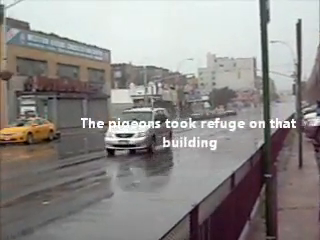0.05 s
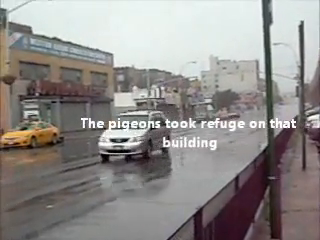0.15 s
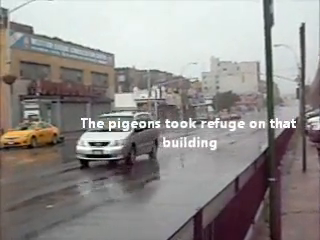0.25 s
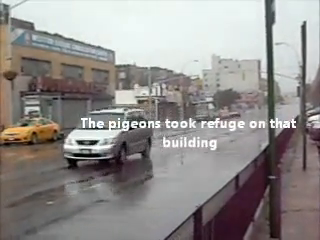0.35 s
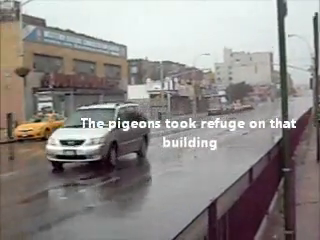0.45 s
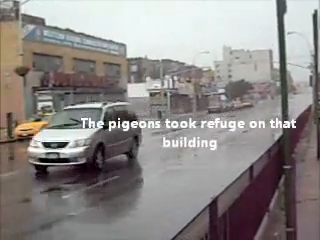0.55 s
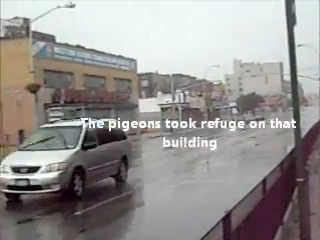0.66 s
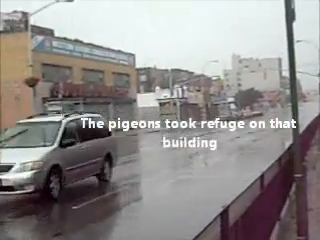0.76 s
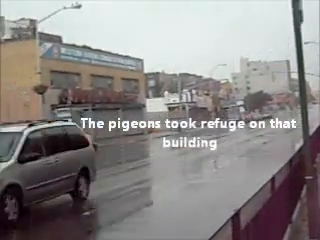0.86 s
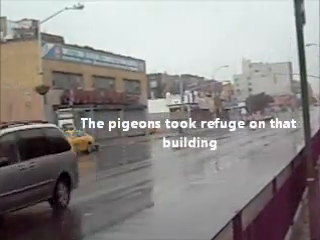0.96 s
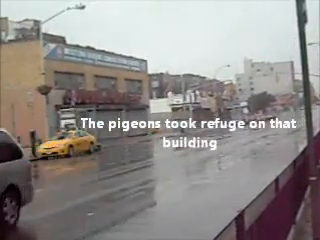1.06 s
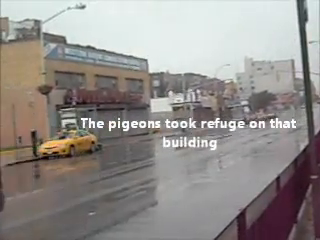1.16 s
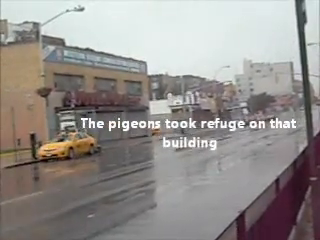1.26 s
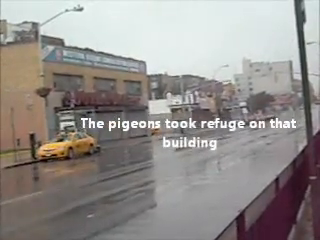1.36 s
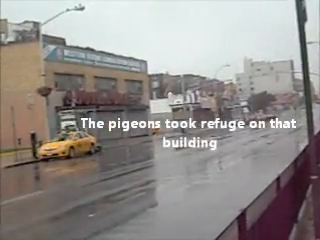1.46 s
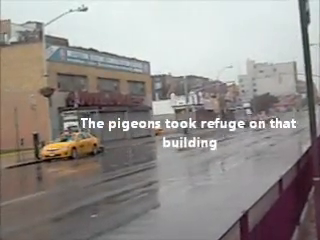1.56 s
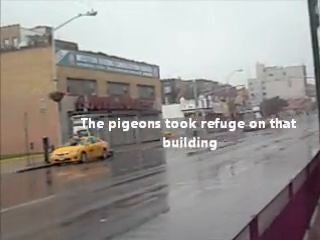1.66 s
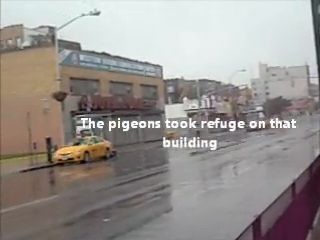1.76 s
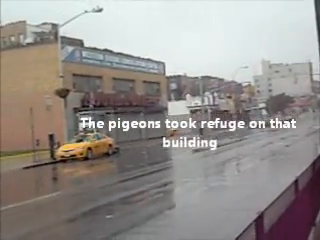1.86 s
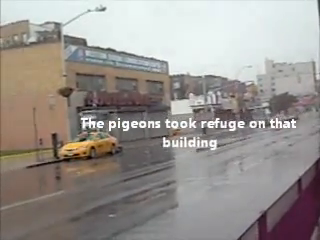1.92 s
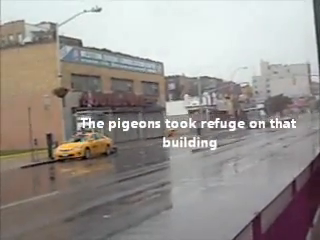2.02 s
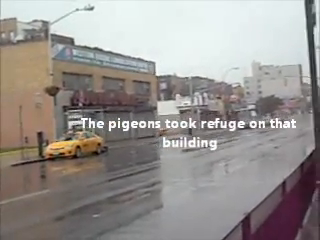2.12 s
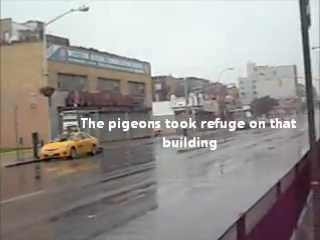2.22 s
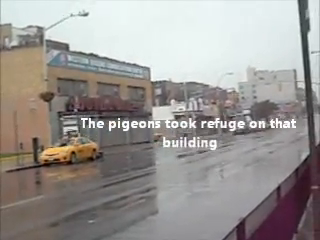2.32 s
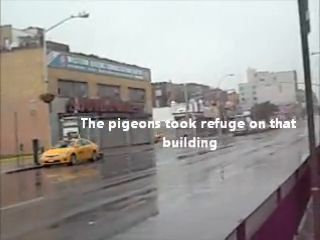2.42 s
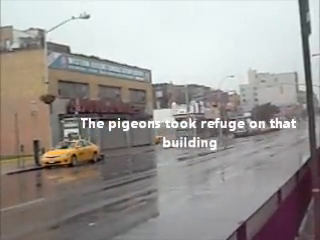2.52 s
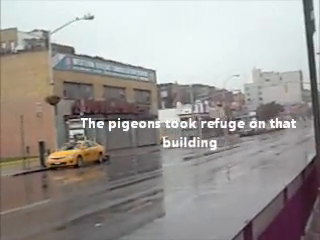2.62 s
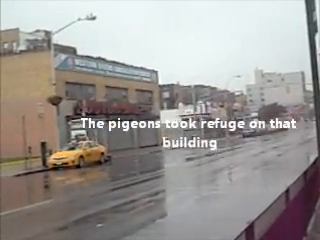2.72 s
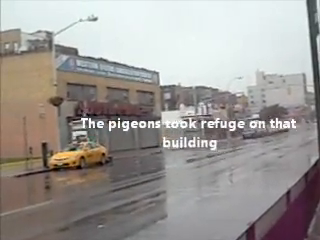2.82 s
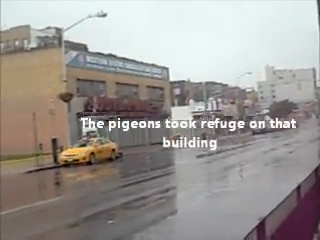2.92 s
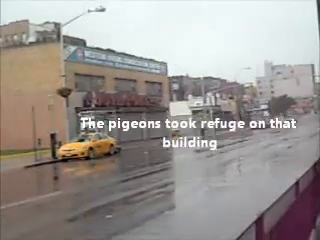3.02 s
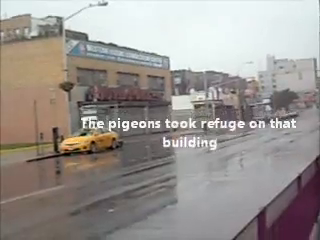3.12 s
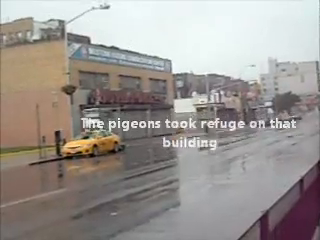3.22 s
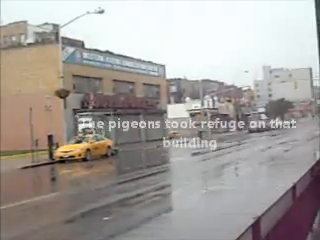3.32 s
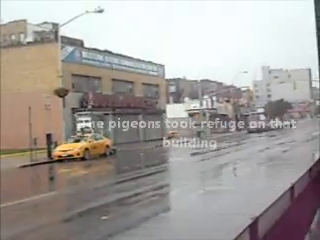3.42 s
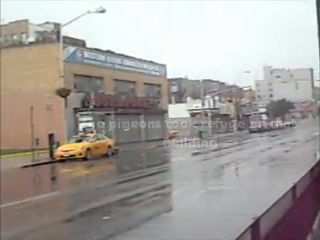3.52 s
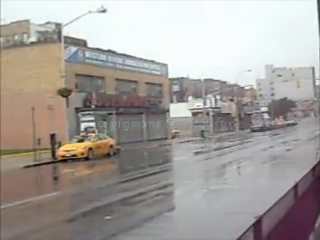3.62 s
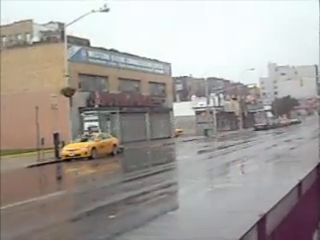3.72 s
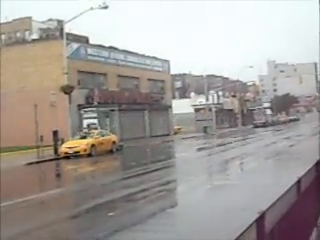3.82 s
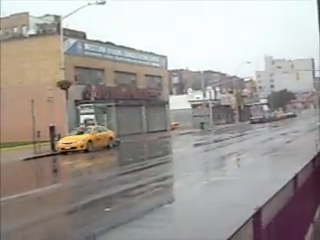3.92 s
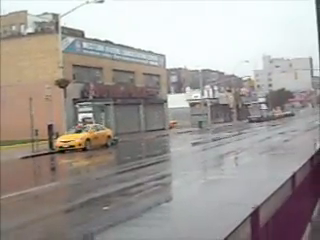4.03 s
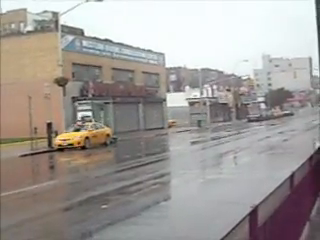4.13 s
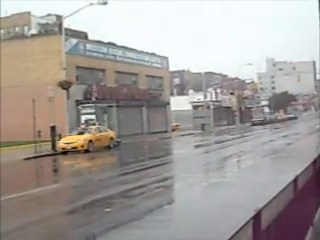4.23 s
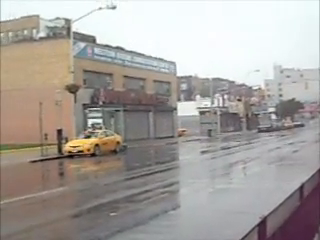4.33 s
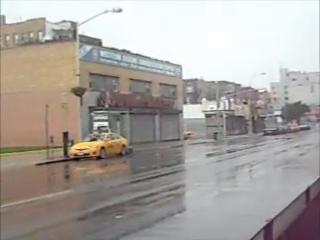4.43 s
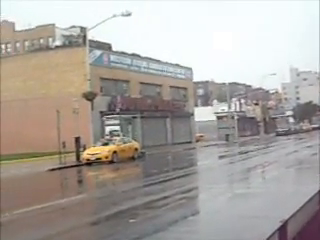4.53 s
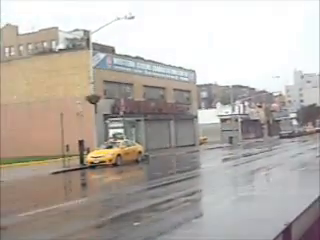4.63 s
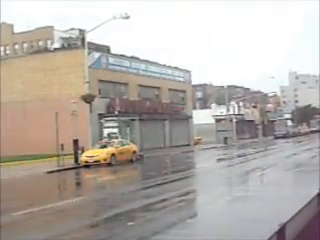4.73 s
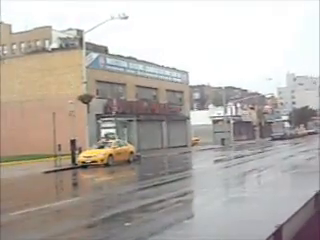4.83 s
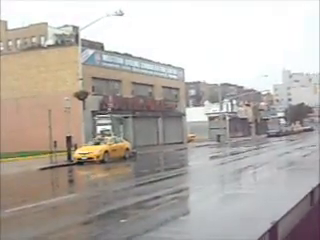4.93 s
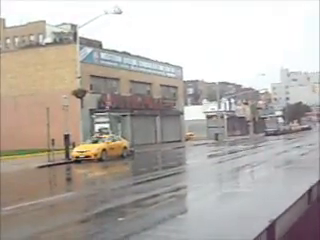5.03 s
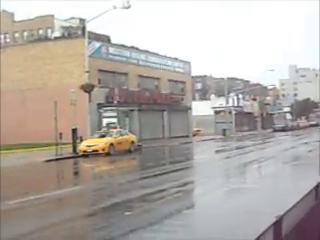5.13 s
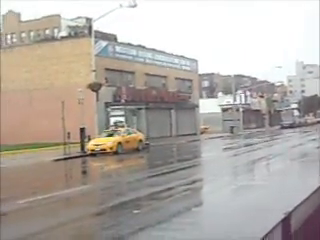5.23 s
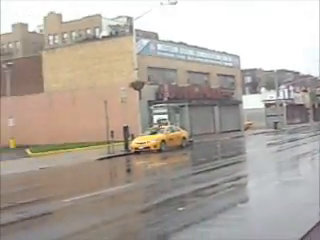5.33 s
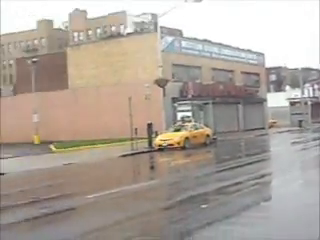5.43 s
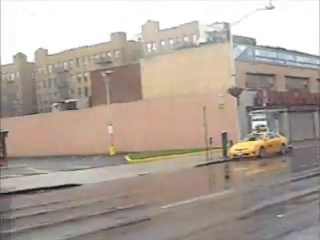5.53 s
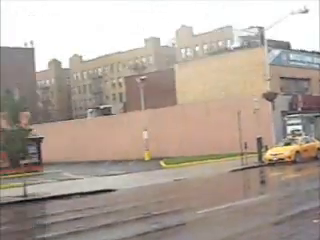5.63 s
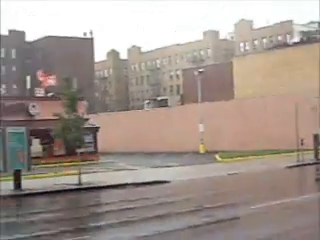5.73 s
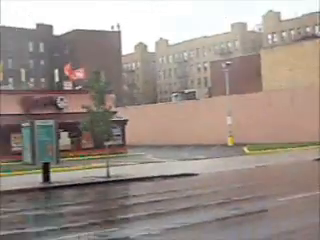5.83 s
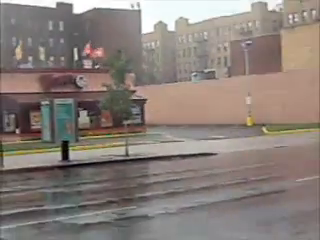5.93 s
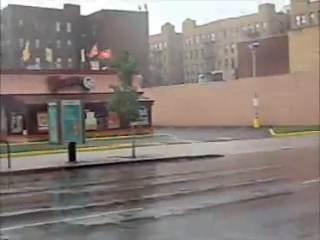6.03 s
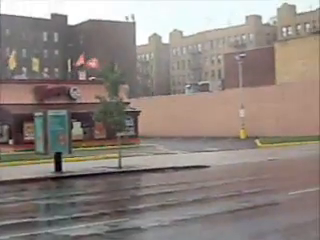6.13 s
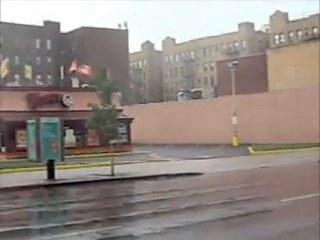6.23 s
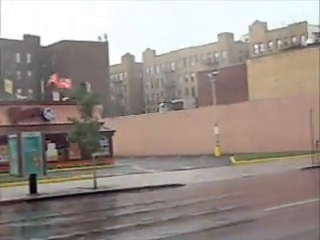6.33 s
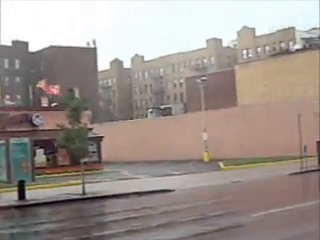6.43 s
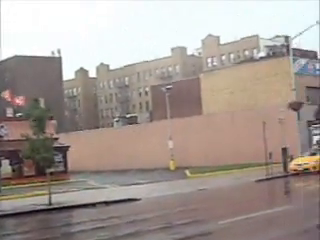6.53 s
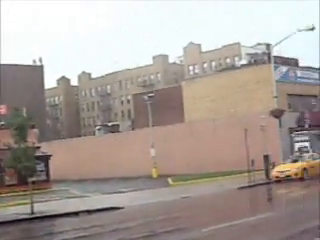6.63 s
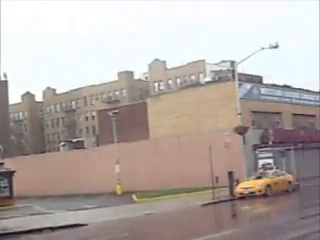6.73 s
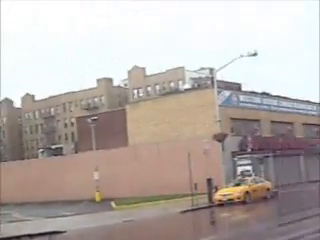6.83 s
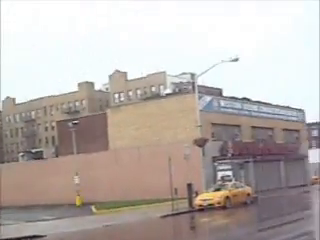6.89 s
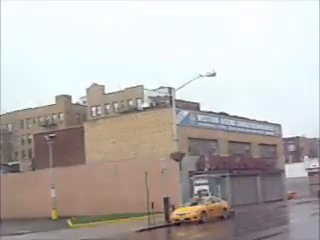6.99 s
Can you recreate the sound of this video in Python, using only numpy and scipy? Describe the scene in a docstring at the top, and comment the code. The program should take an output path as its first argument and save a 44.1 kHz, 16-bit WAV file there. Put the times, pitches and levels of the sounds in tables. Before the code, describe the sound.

Wet tyres swell and fade close by, quieter cars follow, and gusty wind thuds, flutters and finally rattles hard against a narrow-band camera microphone.

```python
"""A minivan hisses past on wet asphalt, close to a small camera on the pavement of a windy city street.
Its tyres are shaped noise that swells and fades with distance; more cars and far traffic swish behind it.
At the microphone, single pressure pulses thump as eddies and noise bursts rattle as gusts, the hardest
into overload. Low wind noise rumbles throughout, and two wavering sines hum as a distant engine."""
import sys
import numpy as np
from scipy import signal
from scipy.fft import rfft, irfft, next_fast_len
from scipy.io import wavfile
from scipy.ndimage import uniform_filter1d, map_coordinates

SR = 44100
rng = np.random.default_rng(int(sys.argv[2]) if len(sys.argv) > 2 else 0)


def waveform_to_disk(signal):
    """Save audio, clipped to [-1, 1], as 16-bit WAV at the path in sys.argv[1]."""
    frames = np.transpose(np.atleast_2d(signal))
    scaled = np.clip(frames, -1, 1) * 32767
    samples = np.round(scaled).astype(np.int16)
    wavfile.write(sys.argv[1], SR, samples)


N = 311346
TIME = np.arange(N) / SR  # s


def amp(db):
    """Decibels to gain."""
    return 10 ** (np.asarray(db) / 20)


def unit(x):
    """Scale to rms 1."""
    return x / np.sqrt(np.mean(x ** 2) + 1e-20)


def curves(rows):
    """One value per sample for each column after the time, gliding between the rows."""
    times, *columns = np.transpose(rows)
    return [np.interp(TIME, times, column) for column in columns]


def wobble(rate):
    """A smooth random curve through normally distributed knots, rate knots a second."""
    knots = rng.standard_normal(int(N * rate / SR) + 4)
    return map_coordinates(knots, [TIME * rate])


def filtered(x, response):
    """x with its spectrum multiplied by a response of frequency in Hz."""
    size = next_fast_len(N + SR // 2)
    hz = np.fft.rfftfreq(size, 1 / SR)
    return irfft(rfft(x, size) * response(hz), size)[:N]


def lowpass(hz, edge_hz, order):
    """Gain of a flat low-pass."""
    return 1 / np.sqrt(1 + (hz / edge_hz) ** (2 * order))


def coloured(x, spectrum):
    """x shaped by (pitch_hz, level_db) points, at rms 1."""
    point_hz, point_db = np.transpose(spectrum)

    def response(hz):
        return amp(np.interp(np.log(hz + 1), np.log(point_hz), point_db))

    return unit(filtered(x, response))


def rush(spectrum, patchy_db):
    """Noise of rms 1 whose gain varies at random in small patches of time and pitch."""
    cells = signal.stft(rng.standard_normal(N), nperseg=1024)[2]
    patches = uniform_filter1d(rng.standard_normal(cells.shape), size=3, axis=0)
    patches = uniform_filter1d(patches, size=7, axis=1)
    noise = signal.istft(cells * amp(patchy_db * unit(patches)), nperseg=1024)[1][:N]
    return coloured(noise, spectrum)


def burst(start, length, edge):
    """An envelope that opens at start and closes after length, with soft edges."""
    opening = np.tanh((TIME - start) / edge)
    closing = np.tanh((TIME - start - length) / edge)
    return (opening - closing) / 2


# Echo off the road as the van comes by: time_s, share (0-1), gliding between points
ROAD_ECHO = [(0, 0.12), (.6, 0.1), (1.1, 0.2), (1.5, 0)]
# How each tyre sound radiates: level_db (against the spray), lag_s (peak after the car is closest),
# breadth (of the swell, against the spray), far_traffic_db
SPRAY_BEAM = (0, 0, 1, -29.5)
SWISH_BEAM = (-6, -0.17, 1.54, -32.5)
ROAR_BEAM = (-11, 0.35, 2, -46)
DRONE_BEAM = (-13.5, 0.47, 1.41, -38.2)
# Relative spectra of swishing water, roaring rubber and droning road: pitch_hz, level_db (per Hz)
SWISH_SPECTRUM = [(500, -32), (1000, -10), (1550, -2.5), (2100, -1), (2700, -5.5), (4000, -18.5),
                  (5000, -51)]
ROAR_SPECTRUM = [(350, -24), (650, -7.5), (900, -1.5), (1150, -2), (1500, -6), (2500, -24.5), (5000, -60)]
DRONE_SPECTRUM = [(30, -8), (90, -2), (170, -6.5), (280, -3), (430, 0), (650, 1), (900, 0), (1600, -24.5),
                  (4000, -61.5)]


def tyres():
    """Treads squeeze water off the asphalt and fling it as spray; the rubber roars underneath."""
    spray_db, swish_db = passing(SPRAY_BEAM, wet=True), passing(SWISH_BEAM, wet=True)
    roar_db, drone_db = passing(ROAR_BEAM, wet=False), passing(DRONE_BEAM, wet=False)
    echo_share, = curves(ROAD_ECHO)
    film_db = 0.2 * wobble(22)  # the water film varies in depth along the road
    spray = unit(rush(SPRAY_SPECTRUM, patchy_db=1.35) + amp(-12.0) * droplets(per_second=1500))
    sound = np.hypot(amp(spray_db + film_db), puddles()) * spray
    sound += amp(swish_db) * rush(SWISH_SPECTRUM, patchy_db=0.76)
    sound += amp(roar_db) * rush(ROAR_SPECTRUM, patchy_db=0.67)
    sound += amp(drone_db) * rush(DRONE_SPECTRUM, patchy_db=1.93)
    # the road mirrors the sound a moment later, which hollows it like a comb
    echo = np.interp(TIME - .00189, TIME, sound)
    return (sound + echo_share * echo) / np.sqrt(1 + echo_share ** 2)


# Cars passing the camera, the near minivan first: closest_s, tyre_level_db,
# span_s (time to cover its own distance from the microphone), water_db (extra from the wet lane)
PASSES = [(1.3, -13.5, .39, 0.73), (2.5, -21, .11, -12), (4.6, -21.8, .42, 0), (5.75, -27.5, .5, -1)]


def passing(beam, wet):
    """Level in dB of one tyre sound: inverse-square swells of the cars over the far traffic."""
    level_db, lag, breadth, far_db = beam
    power = amp(far_db) ** 2
    for closest, tyre_db, span, water_db in PASSES:
        along_road = (TIME - closest - lag) / (span * breadth)
        peak_db = tyre_db + level_db + wet * water_db
        power = power + amp(peak_db) ** 2 / (1 + along_road ** 2)
    return 10 * np.log10(power)


# Wheels cutting through puddles: start_s, level_db (before the fade), length_s
SPLASHES = [(0.169, -20.5, 0.54), (0.635, -16.5, 0.0073), (0.828, -13.5, 0.064), (1.373, -12.5, .06),
            (1.858, -18, .032), (2.084, -18, 0.045), (3.92, -22.5, .6), (4.134, -20.5, 0.082),
            (4.86, -22.5, 0.23)]


def puddles():
    """Gain that each puddle adds to the spray: a sudden opening, then a fade."""
    gain = 0
    for start, db, length in SPLASHES:
        fade = np.exp(-np.abs(TIME - start) / length)
        gain = gain + amp(db) * burst(start, length, edge=length / 10) * fade
    return gain


# Relative spectrum of flung water: pitch_hz, level_db (per Hz)
SPRAY_SPECTRUM = [(900, -35.5), (1800, -17), (2400, -2.5), (3000, 0), (3550, 3), (4000, 0), (4400, -40.5)]


def droplets(per_second):
    """Tiny impacts of flung water, at random times and sizes."""
    hits = rng.random(N) < per_second / SR
    return coloured(hits * rng.standard_normal(N), SPRAY_SPECTRUM)


# Gusts breaking into turbulence at the camera: start_s, length_s, level_db
GUSTS = [(.249, 0.041, -25.5), (5.729, .055, -14.5), (6.021, .034, -18.5), (6.073, .052, -13.5),
         (6.132, .038, -19), (6.177, 0.067, -13), (6.339, 0.174, -29), (6.606, 0.032, -28)]
# upper edge at the hard-gust level, and the level change that moves it an octave
GUST_EDGE_HZ, GUST_DB_PER_OCTAVE, HARD_GUST_DB = 730, 14, -13.5


def gusts():
    """Flow tears off the camera's edge in rattling bursts, brighter when stronger."""
    out = np.zeros(N)
    buffets = amp(2.4 * wobble(150))  # each burst breaks into separate shoves
    for start, length, db in GUSTS:
        edge_hz = GUST_EDGE_HZ * 2 ** ((db - HARD_GUST_DB) / GUST_DB_PER_OCTAVE)

        def turbulence(hz):
            top = lowpass(hz, edge_hz, order=3) * lowpass(hz, 270, order=1)
            return top * hz / np.hypot(hz, 150)  # thins the bass below 150 Hz

        churn = buffets * filtered(rng.standard_normal(N), turbulence)
        gate = burst(start, length, edge=.003)
        rms_in_gate = np.sqrt(np.average(churn ** 2, weights=gate + 1e-12))
        out += amp(db) * gate * churn / rms_in_gate
    return out


# The strongest eddies thumping on the microphone: centre_s, peak_db (approximate), half_width_s
EDDIES = [(.19, -15.5, 0.0034), (.256, -14, .003), (.385, -18.5, .0027), (.478, -16, 0.0045),
          (2.596, -17.5, .0012), (2.815, -19, .0065), (2.836, -14, .0014), (2.885, -16.5, 0.0058),
          (3.445, -20.5, .0013), (3.511, -14, .0076), (4.125, -21.5, .0014), (4.399, -19, 0.0021),
          (4.415, -17, .001), (4.79, -15.5, 0.0013), (4.953, -12, .0009), (5.555, -18, .011),
          (5.592, -16, .01), (5.654, -14.5, 0.0031), (6.056, -13.5, 0.0039), (6.375, -12.5, 0.00073),
          (6.861, -18, .0042)]


def eddies():
    """A vortex crossing the microphone port sucks, then pushes; a smaller one thumps more sharply."""
    out = np.zeros(N)
    for centre, db, width in list(EDDIES) + small_eddies(count=18):
        u = (TIME - centre) / width
        near = np.abs(u) < 10
        distance = np.abs(u[near])
        out[near] += amp(db) * u[near] * np.exp(1 - distance * (1 + distance) / 2)
    return out


SMALL_EDDY_DB, SMALL_EDDY_S = 2, .0018  # peak over the wind level in dB, typical half width in s


def small_eddies(count):
    """Lesser eddies at random, likelier and stronger in the swells: centre_s, peak_db, half_width_s."""
    wind_db = wind_level()
    odds = np.cumsum(amp(wind_db))
    at = np.searchsorted(odds, rng.random(count) * odds[-1])
    widths = SMALL_EDDY_S * np.exp(.5 * rng.standard_normal(count))
    return list(zip(TIME[at], wind_db[at] + SMALL_EDDY_DB, widths))


# Relative spectrum of wind rumbling at the microphone: pitch_hz, level_db (per Hz)
RUMBLE_SPECTRUM = [(8, -18.5), (18, 7.5), (35, 0.5), (65, -4), (110, -13.5), (200, -21), (400, -38),
                   (1000, -63.5)]


def wind():
    """Moving air rumbles in lumps; the stronger it blows, the more it flutters higher up."""
    wind_db = wind_level()
    lumps = wobble(26)
    rumble = coloured(rng.standard_normal(N), RUMBLE_SPECTRUM)
    rumble = amp(wind_db - 1.1 + 2.1 * lumps) * rumble
    flutter = unit(filtered(rng.standard_normal(N), lambda hz: lowpass(hz, 260, order=3)))
    # the flutter gains 1.38 dB for each dB of wind
    return rumble + amp(1.38 * wind_db - 4.5 + 2.2 * lumps) * flutter


# Swells of wind at the camera: centre_s, level_db, half_width_s (standard deviation of the bell)
SWELLS = [(.27, -21.5, .14), (1, -29, .2), (2, -27, .25), (2.83, -24.5, .1), (3.42, -32, .06),
          (3.94, -25, .08), (4.43, -26, .12), (4.88, -24.5, .07), (5.72, -24, .14), (6.38, -26, .1),
          (6.83, -23.5, .12)]
BREEZE_DB = -33.5  # steady wind strength under the swells


def wind_level():
    """Wind strength in dB: bell-shaped swells over the breeze."""
    power = amp(BREEZE_DB) ** 2
    for centre, db, width in SWELLS:
        power = power + amp(db) ** 2 * np.exp(-((TIME - centre) / width) ** 2 / 2)
    return 10 * np.log10(power)


# A distant engine down the street: time_s, fundamental_db, second_harmonic_db, gliding between points
ENGINE_LEVELS = [(2.2, -55.5, -59.5), (2.7, -45, -53), (3.6, -44, -51), (4.7, -54, -44), (5.4, -58, -41),
                 (7.06, -58, -44.5)]
FIRING_HZ, FIRING_DRIFT = 150.9, .01  # mean firing rate, and the share by which each wobble shifts it


def engine():
    """Only the two lowest firing harmonics carry down the street."""
    first_db, second_db = curves(ENGINE_LEVELS)
    hz = FIRING_HZ * (1 + FIRING_DRIFT * (wobble(14) + wobble(1.5)))
    phase = 2 * np.pi * np.cumsum(hz) / SR
    hum = amp(first_db) * np.sin(phase) + amp(second_db) * np.sin(2 * phase)
    fading_db = 2 * wobble(9)  # moving air makes the distant sound come and go
    return np.sqrt(2) * hum * amp(fading_db)  # root 2 makes the levels rms


def scene():
    """Traffic in the street and wind at the microphone."""
    street = tyres() + engine()
    microphone_wind = wind() + eddies() + gusts()
    return (street + microphone_wind)[None]


BAND_HZ, TOP_HZ = 3784, 15900  # edge of the camera's band, and of the treble left after overload


def record(dry):
    """The camera keeps a telephone-like band; peaks overload it and spit a little treble."""
    narrow = filtered(dry[0], lambda hz: lowpass(hz, BAND_HZ, order=28) * lowpass(hz, 4117, order=90))
    ceiling, hardness = .52, 16  # largest output amplitude, sharpness of the bend towards it
    clipped = narrow / (1 + np.abs(narrow / ceiling) ** hardness) ** (1 / hardness)
    return filtered(clipped, lambda hz: hz < TOP_HZ)[None]


dry = scene()
out = record(dry)
waveform_to_disk(out)
```